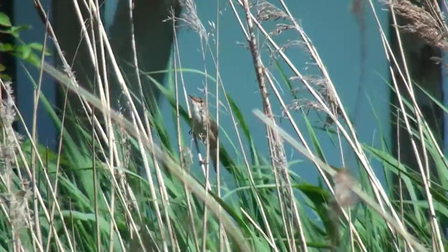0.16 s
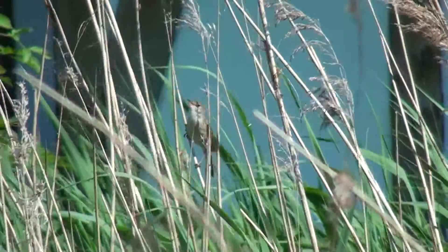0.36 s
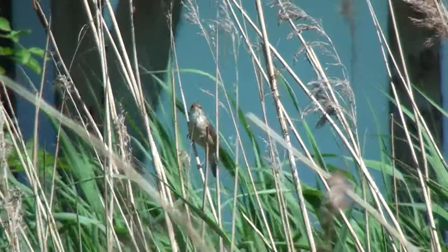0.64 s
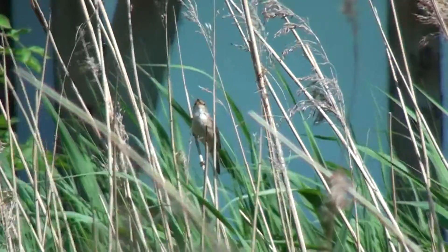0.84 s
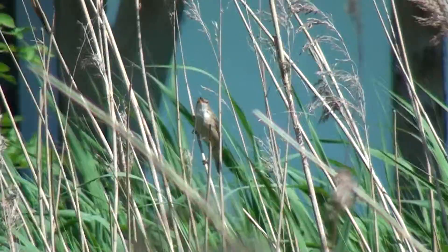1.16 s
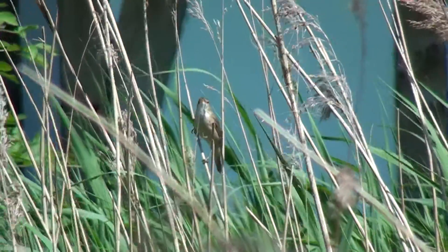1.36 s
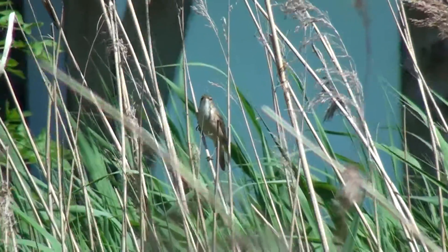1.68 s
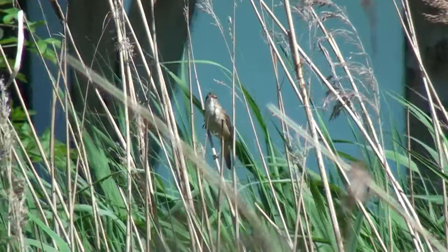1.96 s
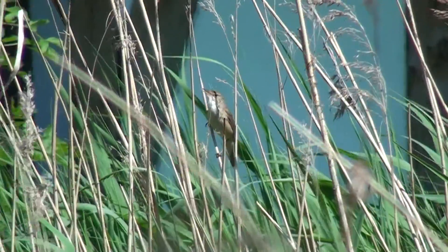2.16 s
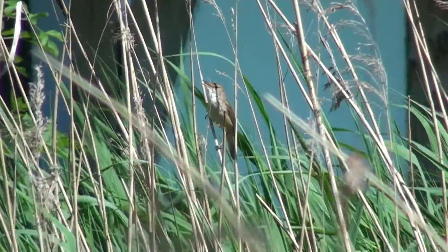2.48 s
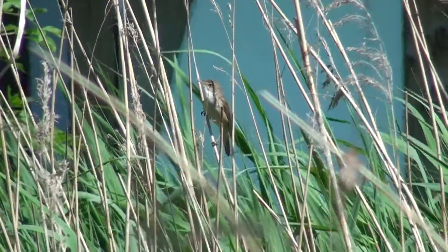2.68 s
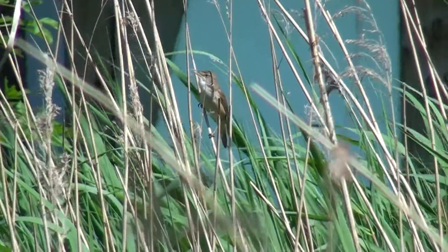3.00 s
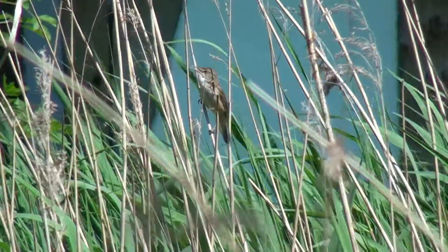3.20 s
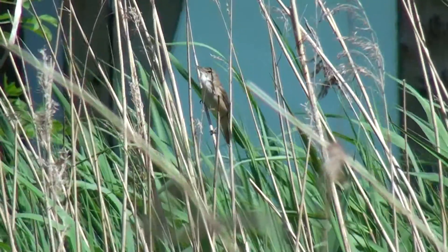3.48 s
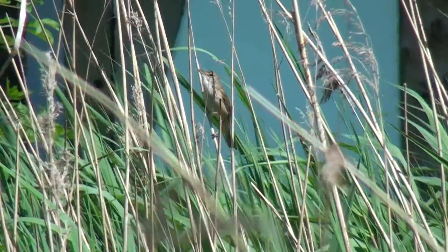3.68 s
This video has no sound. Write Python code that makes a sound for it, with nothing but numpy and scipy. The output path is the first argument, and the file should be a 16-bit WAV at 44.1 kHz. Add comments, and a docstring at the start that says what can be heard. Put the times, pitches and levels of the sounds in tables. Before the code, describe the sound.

Small bird singing scratchy, fast-changing phrases among reeds, with soft breeze and hiss behind.

```python
"""In a reed bed, a reed warbler chatters: nasal notes, two long squeals, trills, a rattle, chips and a buzz.
Each song sound is a stack of harmonics shaped by a throat resonance, with some rough noise mixed in.
Stems scatter the song and a wall sends it back. Faint slurs are late echoes of the trill and squeals,
and some distant birds. A thin high whistle falls and one sharp click cracks.
Behind them, filtered noise makes a leafy rustle, a steady hiss and light wind."""
import sys
import numpy as np
from scipy import signal
from scipy.fft import rfft, irfft
from scipy.io import wavfile

SR = 44100
rng = np.random.default_rng(int(sys.argv[2]) if len(sys.argv) > 2 else 0)


def store_wav(level_fs):
    """Save 16-bit WAV to argv[1]."""
    pcm = np.round(np.clip(np.atleast_2d(level_fs), -1, 1) * 32767)
    wavfile.write(sys.argv[1], SR, pcm.T.astype(np.int16))


N = 169344
T = np.arange(N) / SR


def undb(db):
    """Turn decibels into a gain."""
    return 10 ** (np.asarray(db) / 20)


def unit(x):
    """Scale to rms 1."""
    return x / np.sqrt(np.mean(x ** 2))


def colour(x, points):
    """Shape the spectrum by a curve of (f/Hz, level/dB) points."""
    hz, db = np.array(points).T
    f = np.maximum(np.fft.rfftfreq(len(x), 1 / SR), 1)
    gain = undb(np.interp(np.log(f), np.log(hz), db))
    return irfft(rfft(x) * gain, len(x))


def noise(points):
    """Noise as long as the scene, with the given spectrum and rms 1."""
    return unit(colour(rng.standard_normal(N), points))


def wander(t, rate):
    """Random values joined by straight lines, rate of them a second."""
    return np.interp((t - t[0]) * rate, np.arange(16384), rng.standard_normal(16384))


def add(out, t, x):
    """Mix x into out at its own times."""
    i = int(round(t[0] * SR)) + np.arange(len(x))
    inside = (i >= 0) & (i < N)
    out[i[inside]] += x[inside]


EDGE_S = 0.0011  # fade at each end


def controls(rows):
    """Give the times, a soft-edged gate and the columns of a curve, joined by straight lines."""
    times, *columns = np.array(rows).T
    t = np.arange(times[0], times[-1], 1 / SR)
    gate = np.clip(np.minimum(t - t[0], t[-1] - t) / EDGE_S, 0, 1)
    return (t, gate, *[np.interp(t, times, c) for c in columns])


BELOW_DB, ABOVE_DB = 28, 58  # how fast the throat resonance falls away on each side, dB per octave
LEAK_DB, FUNDAMENTAL_DB = -59, -31  # gain added to every harmonic, and to the lowest one
UPPER_HZ, UPPER_OCTAVES = 4450, 0.2  # a second resonance of the open beak
JITTER, SHIMMER_DB = .028, 2  # random pitch shake at roughness 1 (share of pitch); harmonic level shake
RASP, RASP_OCTAVES, SPRAY_DB = .6, 0.28, -51  # rough noise: amount, bandwidth, broad hiss within it


def syrinx(t, hz, throat_hz, rough, below_db=BELOW_DB, above_db=ABOVE_DB, upper_db=-40, upper_hz=UPPER_HZ):
    """The voice organ gives harmonics that throat and beak shape; roughness shakes pitch and adds rasp."""
    phase = 2 * np.pi * np.cumsum(hz * (1 + JITTER * rough * wander(t, 1100))) / SR
    k = np.arange(1, 11)[:, None]  # harmonic numbers
    octaves = np.log2(k * hz / throat_hz)
    throat = undb(np.minimum(below_db * octaves, -above_db * octaves))
    throat = throat + undb(LEAK_DB) + (k == 1) * undb(FUNDAMENTAL_DB)
    beak = undb(upper_db) * np.exp(-.5 * (np.log2(k * hz / upper_hz) / UPPER_OCTAVES) ** 2)
    gain = (throat + beak) * (k * hz < 12500)
    shimmer = undb(SHIMMER_DB * np.array([wander(t, 247.8) for _ in k]))
    tone = (gain * shimmer * np.sin(k * phase)).sum(0) / np.sqrt((gain ** 2).sum(0))
    f = np.fft.rfftfreq(16384, 1 / SR) + 1
    band = 1 / (1 + (np.log2(f / 3750) / RASP_OCTAVES) ** 4) ** 0.54
    band = band + undb(SPRAY_DB) / (1 + np.log2(f / 5500) ** 4)
    rasp = unit(irfft(band * rfft(rng.standard_normal(16384))))[:len(t)]
    # hold the overall level roughly steady as rasp is added
    return (tone + RASP * rough * rasp) / np.sqrt(1 + 2 * (RASP * rough) ** 2)


EDGE_ROUGH = .18  # extra roughness at the ends of a note


def note(start, length, pitches, throat_hz, rough, swell, below_db=BELOW_DB, upper_db=-30, upper_hz=UPPER_HZ):
    """One note: pitch bends through evenly spaced values, level swells and falls, both ends are hoarser."""
    u = np.linspace(0, 1, int(length * SR))
    t = start + u * length
    bend = np.polyfit(np.linspace(0, 1, len(pitches)), pitches, len(pitches) - 1)
    hz = np.polyval(bend, u)
    hoarse = rough + EDGE_ROUGH * (2 * u - 1) ** 2
    voice = syrinx(t, hz, throat_hz, hoarse, below_db, upper_db=upper_db, upper_hz=upper_hz)
    return t, np.abs(np.sin(np.pi * u)) ** swell * voice


def warbler():
    """The full song: every kind of sound from the one bird, added together."""
    return nasal_notes() + squeals() + trills() + rattle() + chips() + buzz()


# single notes: start t/s, length t/s, start f/Hz, middle f/Hz, end f/Hz, throat f/Hz, level/dB,
# roughness (0 = least), slope below the throat/dB per octave, beak resonance level/dB
NASAL_NOTES = np.array([ (-.015, 0.042, 936, 873, 734, 3470, -34.5, 0.67, 35, -36),
               (.032, 0.084, 2610, 2740, 2500, 3000, -38.5, 0, 30, -12),
               (.035, 0.11, 840, 850, 816, 3600, -40, 1.42, 35, -28),
               (.118, 0.04, 822, 856.5, 818, 3450, -28.5, 0.05, 30, -18),
               (.156, 0.028, 846, 833, 805, 3360, -34, 0.26, 45, -26),
               (.181, 0.033, 756, 862, 707, 3420, -25.5, 0.15, 33, -21),
               (.246, 0.036, 818, 811, 692, 3300, -30, 0.42, 17, -7.5),
               (1.878, 0.018, 2104, 1734, 1390, 4100, -30.5, 0.9, 44, -5),
               (1.887, 0.022, 1028, 935, 890, 3840, -26.5, 0.5, 15, -11),
               (1.922, 0.12, 2150, 2074, 2020, 4000, -39, 0.42, 22, -25),
               (1.993, 0.061, 2065, 2100, 2003, 4120, -32, 0.47, 30, -25),
               (2.062, 0.036, 601, 699, 690, 4150, -31, 0.35, 17, -42),
               (2.127, 0.033, 732, 754, 657, 3110, -29.5, 0.43, 42, -10),
               (2.215, 0.039, 717, 753, 620, 3480, -30, 0.56, 13, -2),
               (2.391, 0.0061, 1010, 1030, 860, 3020, -33.5, 0.4, 43, -27),
               (2.795, 0.032, 1700, 2240, 2520, 4280, -36, 0.4, 36, -20),
               (2.815, 0.0504, 1310, 1306, 1200, 3760, -33.5, 0.56, 27, -12),
               (2.858, 0.029, 1100, 1150, 950, 4240, -32.5, 1.15, 27, -12),
               (2.907, 0.016, 3350, 3910, 5100, 4000, -34, .4, 30, -30),
               (2.914, 0.017, 2500, 2930, 3100, 3000, -31.5, .4, 30, -30),
               (2.922, 0.0118, 4720, 3920, 3200, 4000, -34, .6, 30, -30),
               (2.965, 0.012, 1670, 2430, 1670, 3700, -50, 0.4, 23, -12),
               (2.995, 0.013, 1760, 2474, 2550, 3600, -36.5, 0.4, 9, -14),
               (3.005, 0.012, 4900, 3680, 2820, 3700, -33, .45, 30, -30),
               (3.052, 0.0058, 1900, 2590, 1690, 3500, -50, 0.4, 16, -12),
               (3.498, 0.0296, 1965, 2130, 2400, 4300, -38, 0.3, 9.5, -22),
               (3.513, 0.034, 1070, 1150, 1115, 3600, -35, 0.63, 13, -11)])


def nasal_notes():
    """Short notes whose throat resonance, mostly far above the pitch, makes them nasal."""
    out = np.zeros(N)
    for start, length, first, middle, last, throat, db, rough, slope, upper in NASAL_NOTES:
        t, x = note(start, length, (first, middle, last), throat, rough, swell=.6,
                    below_db=slope, upper_db=upper)
        add(out, t, x * undb(db))
    return out


# the path of each long squeal: t/s, f/Hz, level/dB, roughness (0 = clear)
SQUEAL_PATHS = [
    [(.811, 1896, -37.5, 0.2), (.828, 1580, -33, 0.34), (.856, 1469, -40.5, 0.37), (.90, 1491, -32.5, 0.25),
     (.935, 1502, -32, 0.3), (.962, 1510, -29.5, 0.3), (.974, 1484, -29.5, 0.3), (.987, 1289, -22, 0.2),
     (.995, 1164, -30, 0.1), (1.019, 822, -33, 0.8)],
    [(1.103, 1492, -34, 0.6), (1.109, 1315, -28, 0.7), (1.122, 1145, -28.5, 0.2), (1.137, 1188, -26, 0.17),
     (1.163, 1161, -29.5, 0.04), (1.186, 1236, -30.5, .25), (1.225, 1294, -22.5, 0.05),
     (1.251, 1307, -23.5, 0), (1.272, 1146, -26.5, 0.1), (1.285, 924, -36, 0.6)],
]
# one throat per squeal: throat f/Hz, slope above it/dB per octave, high resonance level/dB
SQUEAL_VOICES = [(3850, 44.5, -45), (3770, 49, -49)]
SQUEAL_UPPER_HZ, SQUEAL_FLUTTER = 11200, .007  # high resonance; random pitch shake (share of pitch)


def squeals():
    """Two long cries that glide in pitch with a fine flutter."""
    out = np.zeros(N)
    for rows, (throat, above, upper) in zip(SQUEAL_PATHS, SQUEAL_VOICES):
        t, gate, hz, db, rough = controls(rows)
        hz = hz * (1 + SQUEAL_FLUTTER * wander(t, 505))
        voice = syrinx(t, hz, throat, rough, above_db=above, upper_db=upper, upper_hz=SQUEAL_UPPER_HZ)
        add(out, t, gate * undb(db) * voice)
    return out


# trill pips: centre t/s, length t/s, pitch f/Hz, throat f/Hz, level/dB
TRILL_PIPS = np.array([ (.440, .013, 1916, 3850, -26.5), (.466, 0.015, 1885, 3850, -23.5),
              (.493, 0.02, 1926, 3850, -24.5), (.520, .015, 1894, 3850, -21.5),
              (.549, 0.02, 1920, 3850, -22), (.578, .022, 1820, 3500, -24), (.606, .025, 1863, 3620, -23.5),
              (2.418, 0.014, 1908, 3850, -28), (2.444, 0.021, 1920, 3850, -28),
              (2.470, .017, 1954, 3850, -27.5), (2.498, .015, 1920, 3850, -24.5),
              (2.525, 0.018, 1863, 3820, -22.5), (2.552, 0.015, 1897, 3800, -20.5),
              (2.580, .02, 1804, 3800, -23.5), (2.608, 0.02, 1840, 3850, -23.5)])
# pitch bend of a pip, as shares of its pitch: a slight rise, then a steep hook downward
PIP_BEND = (.95, 1.003, .992, .83)
PIP_ROUGH, PIP_BELOW_DB = 0.2, 19  # roughness; slope below the throat, dB per octave
PIP_UPPER_DB, PIP_UPPER_HZ = -32, 5530  # beak resonance


def trills():
    """Quick rows of short pips, each hooking downward at its end."""
    out = np.zeros(N)
    for centre, length, hz, throat, db in TRILL_PIPS:
        t, x = note(centre - length / 2, length, hz * np.array(PIP_BEND), throat, PIP_ROUGH, swell=1.6,
                    below_db=PIP_BELOW_DB, upper_db=PIP_UPPER_DB, upper_hz=PIP_UPPER_HZ)
        add(out, t, x * undb(db))
    return out


# closing rattle: centre t/s, length t/s, pitch f/Hz, fall as share of pitch, throat f/Hz, level/dB,
# beak resonance level/dB
RATTLE_NOTES = np.array([(3.565, 0.019, 855, 0, 2650, -36, -25), (3.587, 0.013, 886, 0, 2720, -29, -33),
                (3.608, .015, 882, 0.032, 2700, -30, -34), (3.633, 0.016, 892, 0.023, 2980, -27.5, -27),
                (3.657, 0.019, 902, 0.045, 3200, -28, -24), (3.679, .019, 905, 0.086, 3380, -31, -28)])
RATTLE_ROUGH, RATTLE_BELOW_DB, RATTLE_UPPER_HZ = 0.29, 28, 5170  # slope in dB per octave


def rattle():
    """A closing row of low notes whose throat resonance climbs overall from first to last."""
    out = np.zeros(N)
    for centre, length, hz, fall, throat, db, upper in RATTLE_NOTES:
        pitches = hz * np.array([1 + fall, 1, 1 - 2 * fall])
        t, x = note(centre - length / 2, length, pitches, throat, RATTLE_ROUGH, swell=1.1,
                    below_db=RATTLE_BELOW_DB, upper_db=upper, upper_hz=RATTLE_UPPER_HZ)
        add(out, t, x * undb(db))
    return out


# two-voiced chips: start t/s, length t/s, level/dB
CHIP_CALLS = np.array([(1.431, 0.032, -26.5), (1.483, .036, -24), (1.643, 0.0333, -23.5),
              (1.692, 0.04, -24)])
CHIP_HZ, CHIP_THROAT_HZ, CHIP_ROUGH = (1513, 1917, 2030), 4000, .34  # pitch at start, middle, end
SECOND_HZ, SECOND_THROAT_HZ = (2450, 2740, 2700), 4060  # the other side of the syrinx
SECOND_DB, SECOND_LATE_S = -13, 0.0075  # against the first voice


def chips():
    """Rising chips: both sides of the syrinx sound, the second fainter and slightly late."""
    out = np.zeros(N)
    for start, length, db in CHIP_CALLS:
        t, x = note(start, length, CHIP_HZ, CHIP_THROAT_HZ, CHIP_ROUGH, swell=2.2, below_db=19)
        add(out, t, x * undb(db))
        t, x = note(start + SECOND_LATE_S, length, SECOND_HZ, SECOND_THROAT_HZ, CHIP_ROUGH, swell=1.9)
        add(out, t, x * undb(db + SECOND_DB))
    return out


# path of the buzz: t/s, f/Hz, level/dB, roughness (0 = clear)
BUZZ_PATH = [(3.073, 3660, -44, .4), (3.087, 3080, -34, 0.26), (3.125, 3050, -32.5, .45),
             (3.16, 3060, -30, 0.47), (3.18, 3200, -30, 0), (3.197, 3080, -28, 0.2),
             (3.22, 3030, -29.5, 0.37), (3.245, 2950, -30.5, 0.72), (3.273, 3000, -36.5, 1.6)]
BUZZ_THROAT_HZ, BUZZ_PULSE_HZ = 3066, 150.2  # throat; average pulse rate
BUZZ_SCATTER, BUZZ_SHARPNESS = .13, 1.3  # random share of the pulse rate; power that narrows the pulses
BUZZ_SWING, BUZZ_DRIFT = .11, .017  # pitch sweep in each pulse, random pitch shake (shares of pitch)
BUZZ_RASP_DB, BUZZ_RASP_HZ = -25, 4300  # noise against the buzz level; its strongest frequency


def buzz():
    """A tone and noise chopped into fast uneven pulses, heard as a buzz."""
    out = np.zeros(N)
    t, gate, hz, db, rough = controls(BUZZ_PATH)
    beat = 2 * np.pi * np.cumsum(BUZZ_PULSE_HZ * (1 + BUZZ_SCATTER * wander(t, 83))) / SR
    pulses = np.abs(np.sin(beat / 2)) ** BUZZ_SHARPNESS * undb(2.0 * wander(t, 154))
    sweep = .5 - beat / (2 * np.pi) % 1  # each pulse is a tiny downward chirp
    hz = hz * (1 + BUZZ_SWING * sweep + BUZZ_DRIFT * wander(t, 300))
    add(out, t, gate * pulses * undb(db) * syrinx(t, hz, BUZZ_THROAT_HZ, rough))
    spectrum = [(2000, -25), (BUZZ_RASP_HZ, 0), (5800, -8), (8500, -28)]  # f/Hz, level/dB
    rasp = unit(colour(rng.standard_normal(len(t)), spectrum))
    add(out, t, gate * pulses * undb(db + BUZZ_RASP_DB) * rasp)
    return out


# spectrum of the click before its low cut: f/Hz, level/dB
CLICK_SPECTRUM = [(300, -33), (550, -9), (800, 0.5), (1600, 3), (2600, -4.5), (5000, -11), (7400, -4),
                  (10000, -5), (13000, -26), (16000, -16)]
CLICK_S, CLICK_DB = .5853, -19  # start; noise level before the low cut
CLICK_HOLD_S, CLICK_DECAY_S = 0.00076, 0.0015


def click():
    """One dry crack: a burst of noise that dies in a few milliseconds."""
    age = T - CLICK_S
    burst = (age >= 0) * np.exp(-np.maximum(age - CLICK_HOLD_S, 0) / CLICK_DECAY_S)
    crack = undb(CLICK_DB) * burst * noise(CLICK_SPECTRUM)
    low_cut = signal.butter(4, 760, "high", fs=SR, output="sos")
    return signal.sosfilt(low_cut, crack)


# late echoes of the trill and squeals, and some distant birds:
# start t/s, length t/s, start f/Hz, end f/Hz, level/dB
FAINT_SLURS = np.array([(.72, 0.073, 3470, 3400, -49), (1.06, 0.096, 3420, 3457, -36.5),
               (1.33, 0.1, 3440, 3100, -48.5), (2.29, 0.096, 3820, 3450, -48),
               (2.66, 0.088, 4300, 4450, -53.5), (2.70, 0.1, 3550, 3504, -47.5),
               (3.29, 0.18, 2040, 1686, -53.5), (3.70, 0.077, 2450, 2250, -55)])


def faint_slurs():
    """Faint slurs, wavering in level: late echoes of the trill and squeals, and some distant birds."""
    out = np.zeros(N)
    for start, length, first, last, db in FAINT_SLURS:
        t, x = note(start, length, (first, (first + last) / 2, last), first, 0.064, swell=0.53)
        add(out, t, x * undb(db + 2.3 * wander(t, 126)))
    return out


# path of the thin whistle: t/s, f/Hz, level/dB
WHISTLE_PATH = [(1.775, 8700, -55), (1.805, 8480, -51.5), (1.85, 8240, -46), (1.875, 8180, -54),
                (1.92, 8000, -56), (1.99, 7750, -61)]


def whistle():
    """A faint, falling, nearly pure tone, likely another small bird; its pitch shakes slightly."""
    out = np.zeros(N)
    t, gate, hz, db = controls(WHISTLE_PATH)
    phase = 2 * np.pi * np.cumsum(hz * (1 + 0.011 * wander(t, 1980))) / SR
    add(out, t, gate * undb(db) * np.sin(phase))
    return out


# echoes of the song: delay t/s, level/dB
ECHO_DELAYS = [(.0095, -8.5), (.056, -15.5), (0.106, -30), (0.17, -45)]
# left against right for sounds in the reeds: f/Hz, level/dB
SONG_PAN = [(1500, -1), (2800, -1.5), (3600, -3), (4500, 3), (6000, -0.5), (8000, 0.5)]
SCATTER_DB, SCATTER_T60_S = -12, 0.26  # near stems; T60 is the time to fade by 60 dB
FAR_DB, FAR_T60_S = -16, 0.24  # far tail


def reed_bed(x):
    """Direct sound, a few clear reflections, scatter from near stems and a faint far tail."""
    t = T[:SR]

    def tail(t60, rise_s):
        h = rng.standard_normal(SR) * undb(-60 * t / t60) * (1 - np.exp(-t / rise_s))
        return h / np.linalg.norm(h)

    def scattered():
        near = undb(SCATTER_DB) * tail(SCATTER_T60_S, 0.01)
        far = undb(FAR_DB) * tail(FAR_T60_S, 0.0041)
        return signal.fftconvolve(x, near + far)[:N]

    mid, side = scattered(), scattered()
    echoes = sum(undb(db) * np.pad(x, (int(delay * SR), 0))[:N] for delay, db in ECHO_DELAYS)
    left, right = widen(x + echoes + mid, side * 1.16)
    pan = np.array(SONG_PAN)
    return np.array([colour(left, pan * [1, .5]), colour(right, pan * [1, -.5])])


# side filter for the stereo width: f/Hz, level/dB
STEREO_WIDTH = [(40, -31), (100, -31), (250, -24), (600, -16), (1200, -10.5), (4000, -7.5), (7000, -11),
                (12000, -46)]


def widen(mid, side):
    """Left and right from a mid and a filtered side, nearly mono in the highest treble."""
    return mid + np.array([[1], [-1]]) * colour(side, STEREO_WIDTH)


# loudness of the rustle: t/s, level/dB
RUSTLE_LOUDNESS = [(0, -62.5), (.32, -57.5), (.6, -63.5), (1.2, -65), (2.2, -63.5), (3.84, -88)]
# relative spectrum of the rustle: f/Hz, level/dB
RUSTLE_SPECTRUM = [(2000, -24), (6000, 3), (10000, 5.5), (12500, -5), (16000, -26)]


def rustle():
    """Dry leaves brush together in a short gust: a soft flickering hiss."""
    level_db = np.interp(T, *np.array(RUSTLE_LOUDNESS).T) + 1.9 * wander(T, 42)
    return noise(RUSTLE_SPECTRUM) * undb(level_db)


# relative spectrum of the steady outdoor hiss: f/Hz, level/dB
AIR_SPECTRUM = [(15, -40), (25, -2.5), (53, 0.5), (80, 3), (165, -6), (361, -6.5), (557, -7.5), (654, -6.5),
                (981, -9.5), (1390, -15), (1930, -13), (2390, -15.5), (3780, -14), (4100, -18), (5820, -25),
                (9990, -27), (15800, -33)]
AIR_DB = -46.5  # average level of that hiss
# relative spectrum of the wind: f/Hz, level/dB
WIND_SPECTRUM = [(30, 0), (70, 2), (160, 2.5), (320, 6), (600, -4), (1200, -9), (3000, -41)]
# loudness of the wind: t/s, level/dB
WIND_LOUDNESS = [(0, -52.5), (1.5, -54), (2.1, -51.5), (2.8, -47), (3.2, -51.5), (3.6, -46.5), (3.84, -47)]


def breeze():
    """Steady outdoor hiss and a low wash of wind that rises and falls and ends stronger."""
    def bed(points):
        return widen(noise(points), noise(points))

    air = bed(AIR_SPECTRUM) * undb(AIR_DB + .5 * wander(T, 6.78))
    gust_db = np.interp(T, *np.array(WIND_LOUDNESS).T) + 0.51 * wander(T, 9.9)
    return air + bed(WIND_SPECTRUM) * undb(gust_db)


CLICK_SIDE_DB, CLICK_ECHO_DB = -12, -13.5  # stereo spread of the click; its share sent into the reeds


def scene():
    """The birds in the reeds, the near click, the breeze and its rustle."""
    crack = click()
    near = crack + np.array([[1], [-1]]) * undb(CLICK_SIDE_DB) * click()
    in_reeds = warbler() + whistle() + faint_slurs() + undb(CLICK_ECHO_DB) * crack
    return reed_bed(in_reeds) + near + breeze() + rustle()


TOP_HZ = 15800


def record(dry):
    """The recorder cuts the top: a steep low-pass filter, run both ways so it adds no delay."""
    low_pass = signal.ellip(10, .05, 60, TOP_HZ, fs=SR, output="sos")
    return signal.sosfiltfilt(low_pass, dry)


dry = scene()
out = record(dry)
store_wav(out)
```